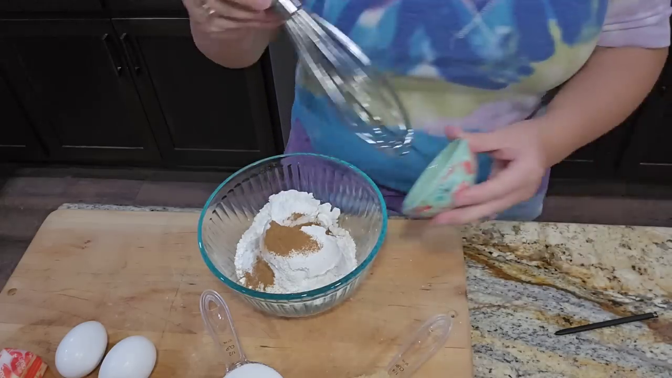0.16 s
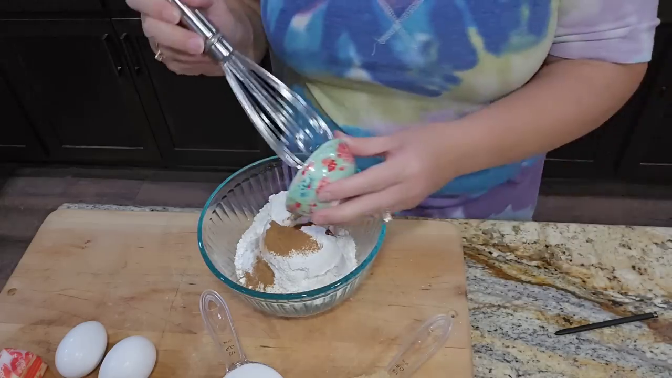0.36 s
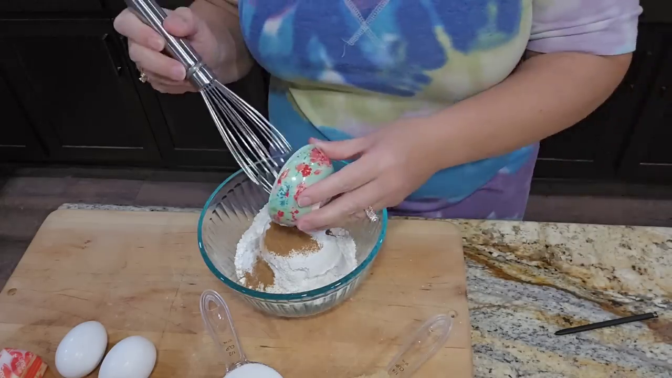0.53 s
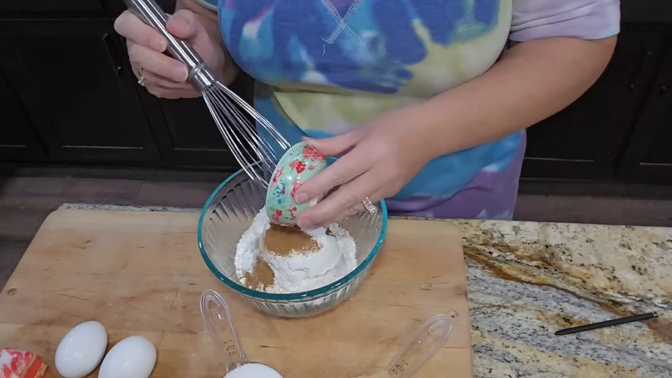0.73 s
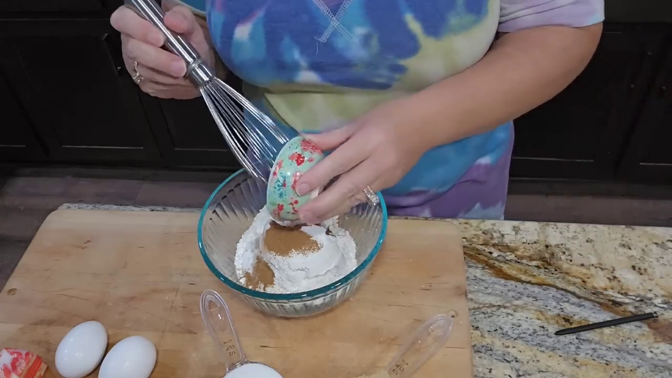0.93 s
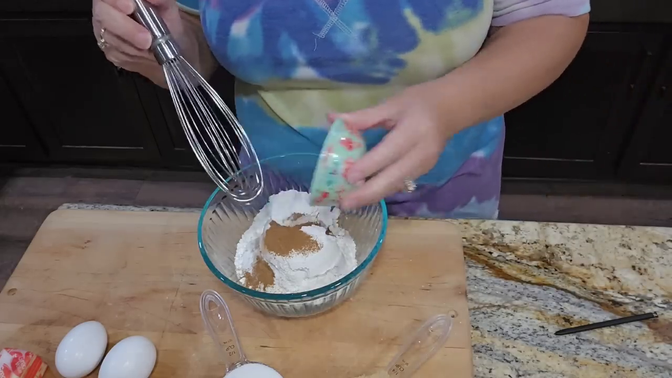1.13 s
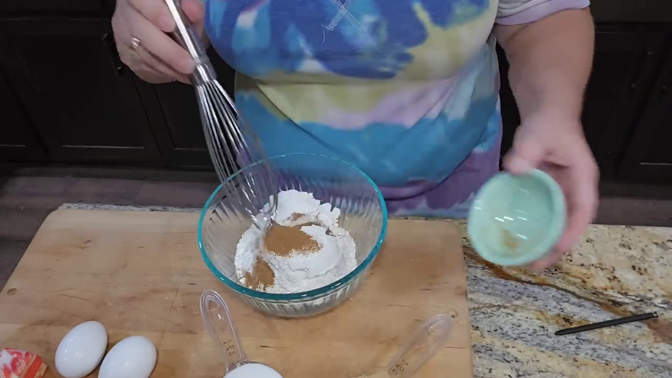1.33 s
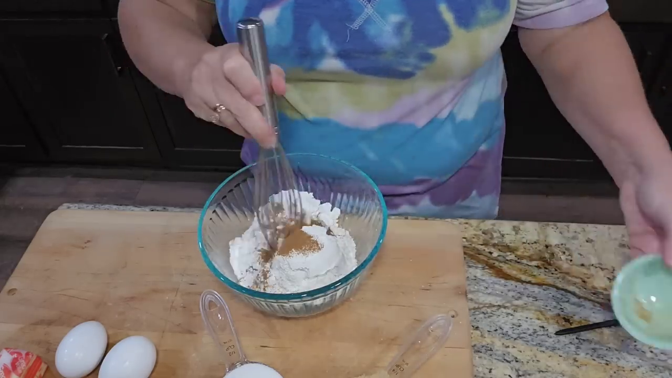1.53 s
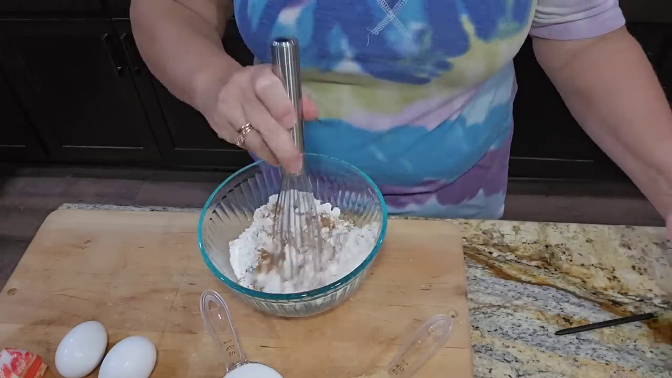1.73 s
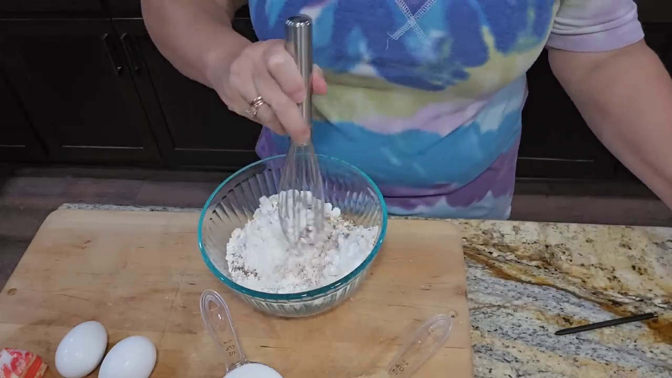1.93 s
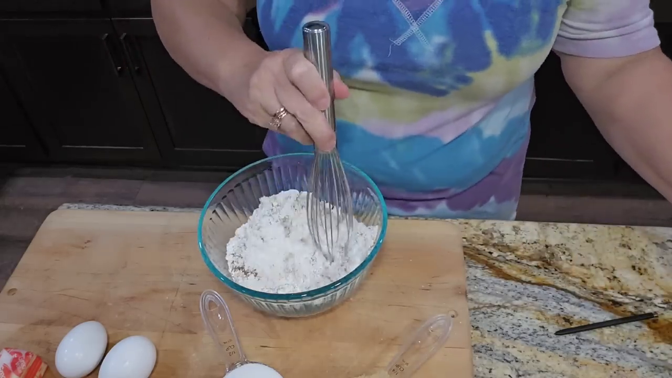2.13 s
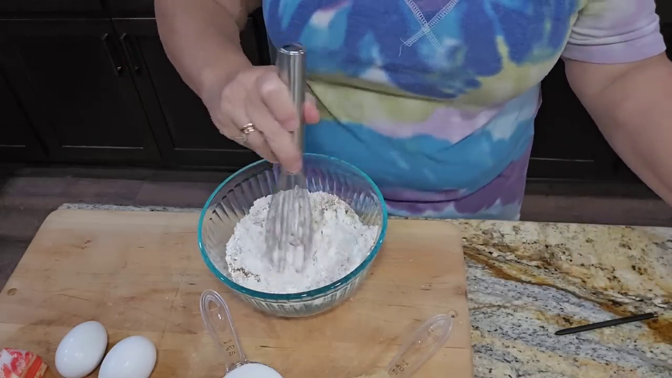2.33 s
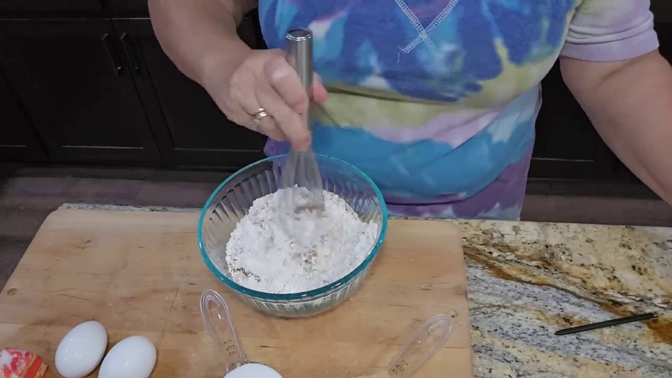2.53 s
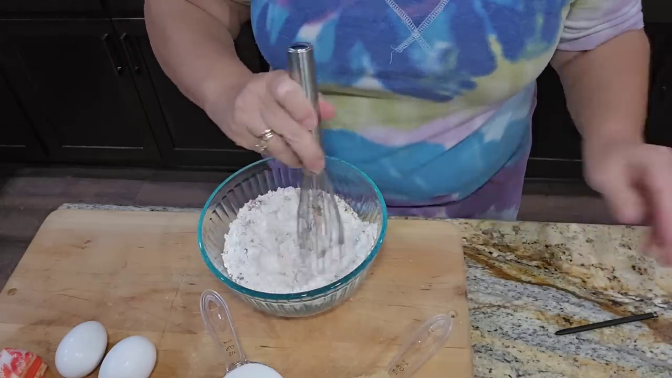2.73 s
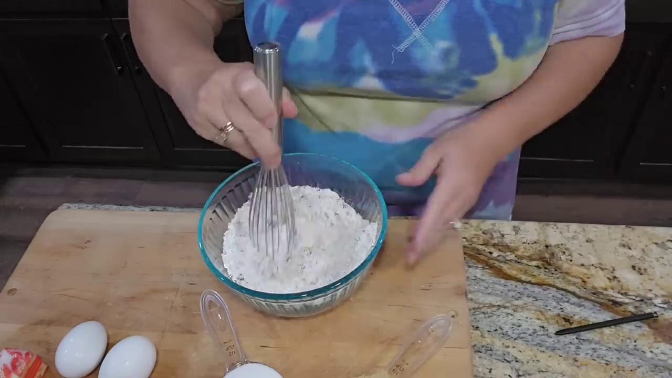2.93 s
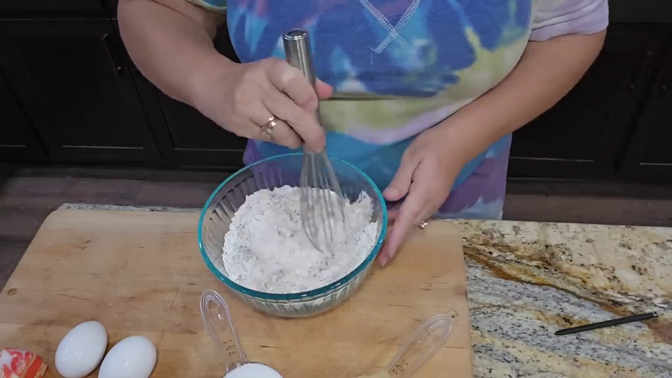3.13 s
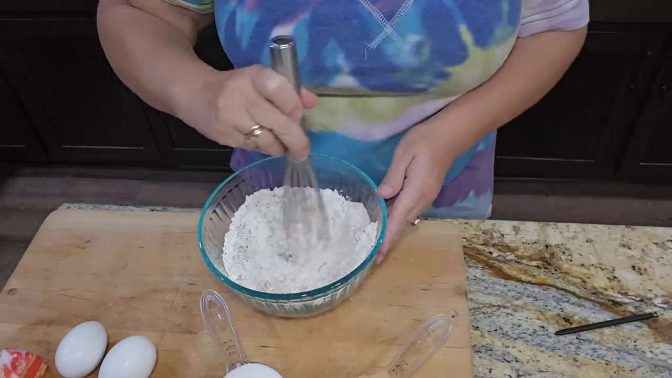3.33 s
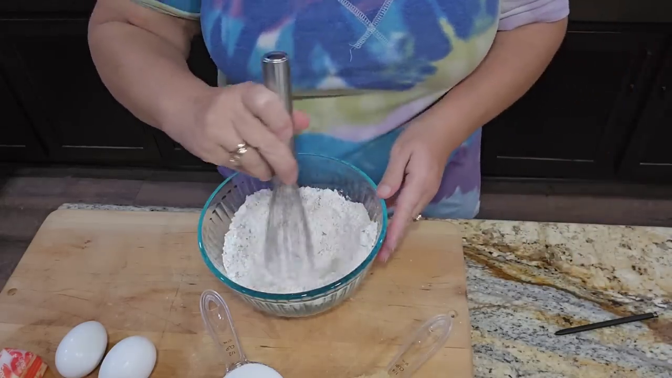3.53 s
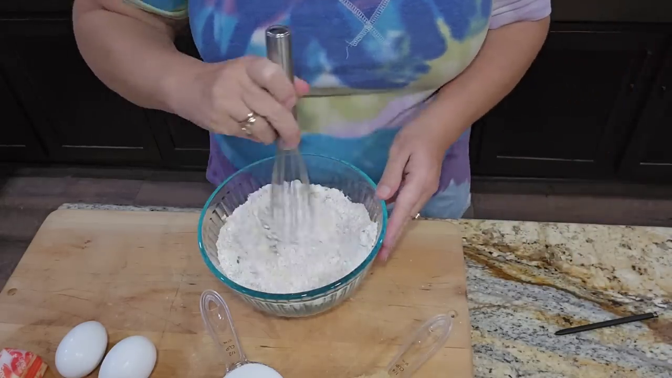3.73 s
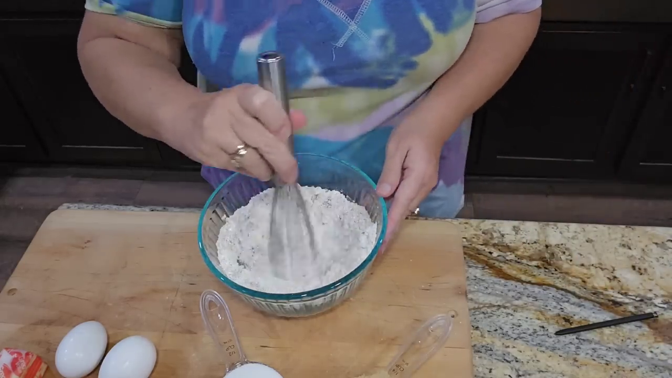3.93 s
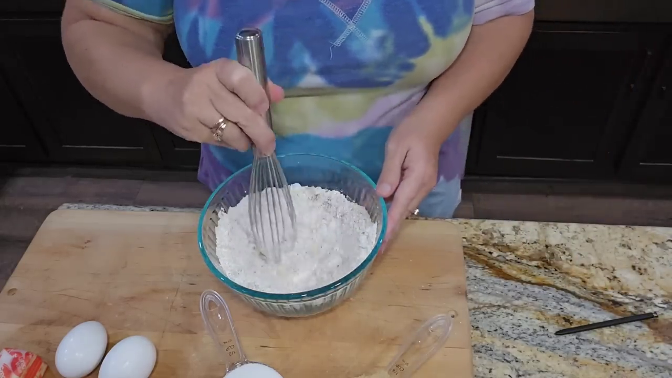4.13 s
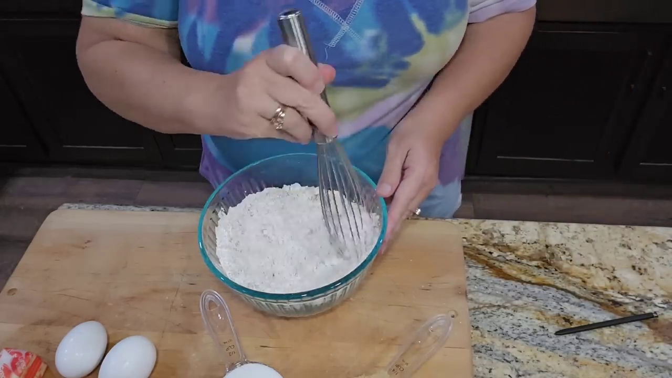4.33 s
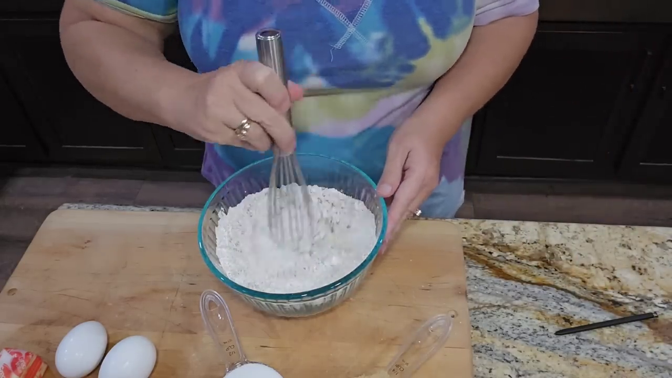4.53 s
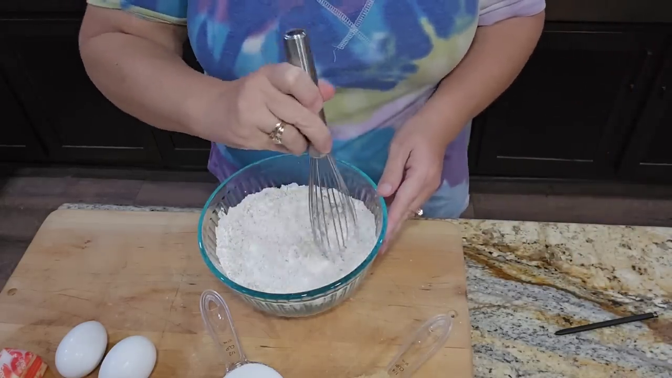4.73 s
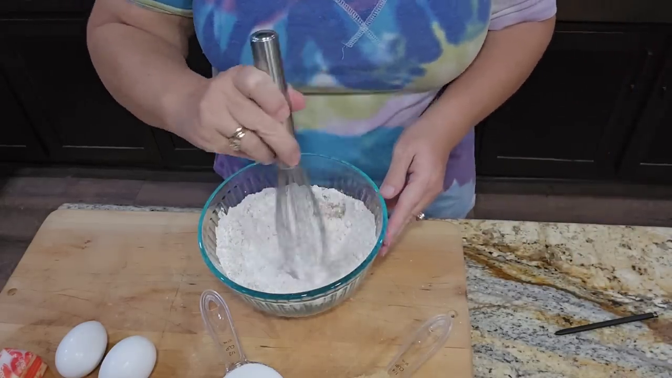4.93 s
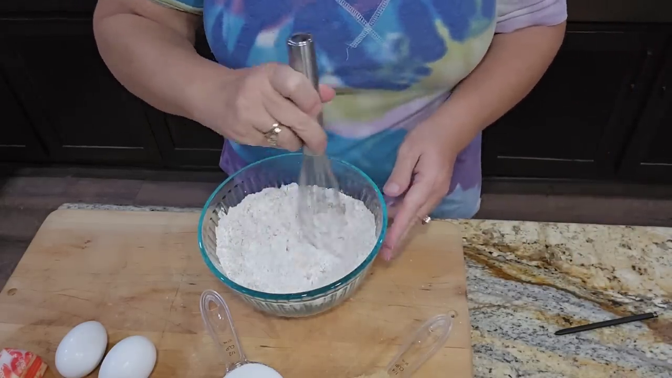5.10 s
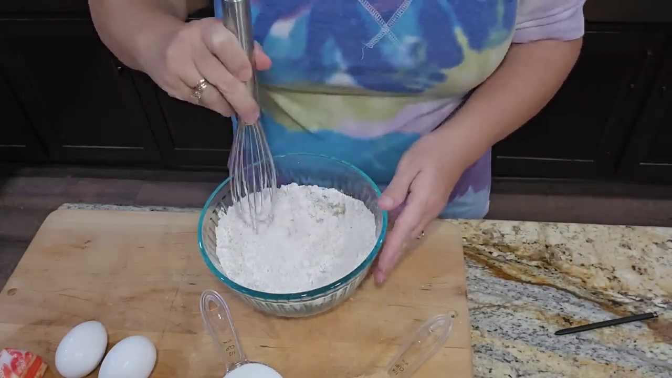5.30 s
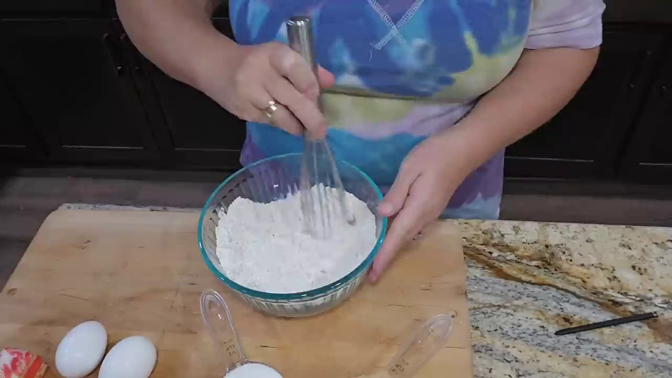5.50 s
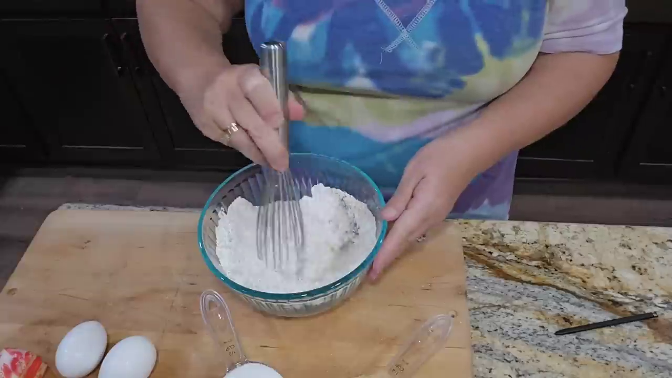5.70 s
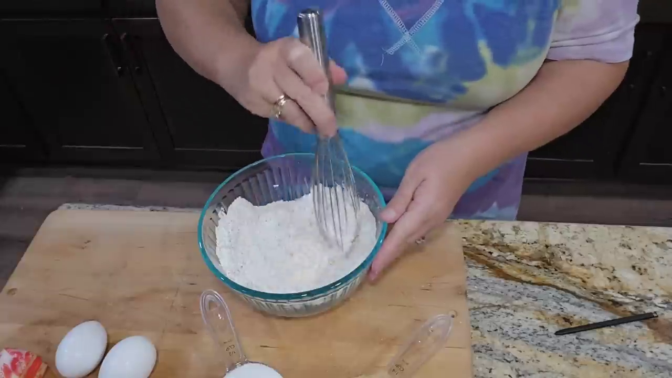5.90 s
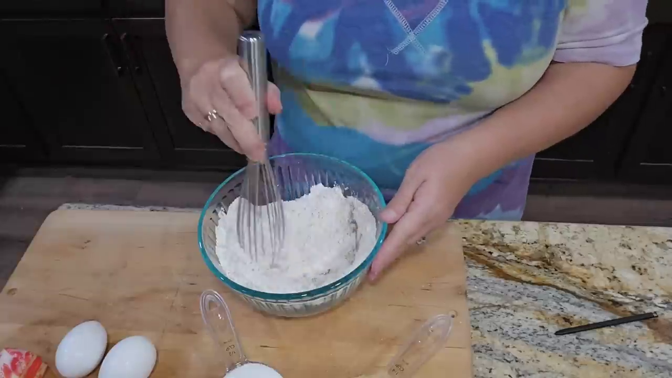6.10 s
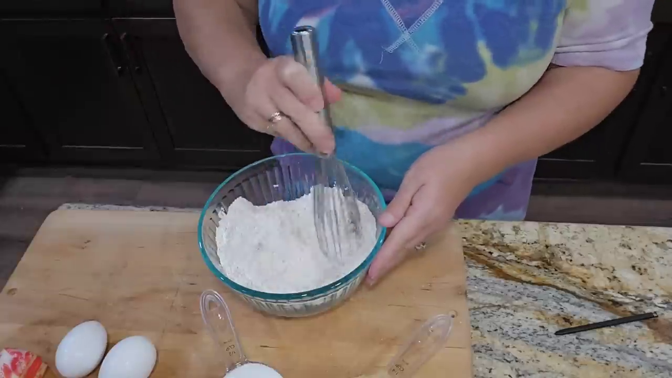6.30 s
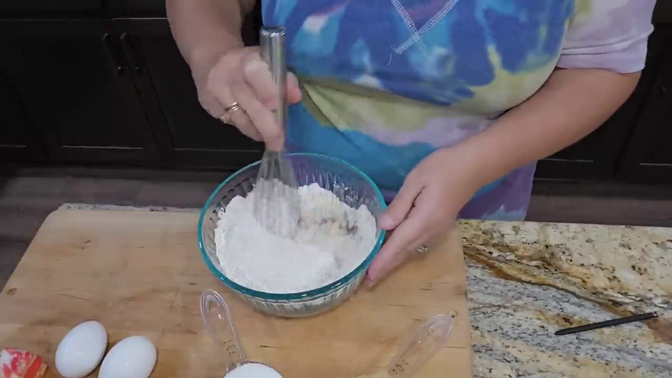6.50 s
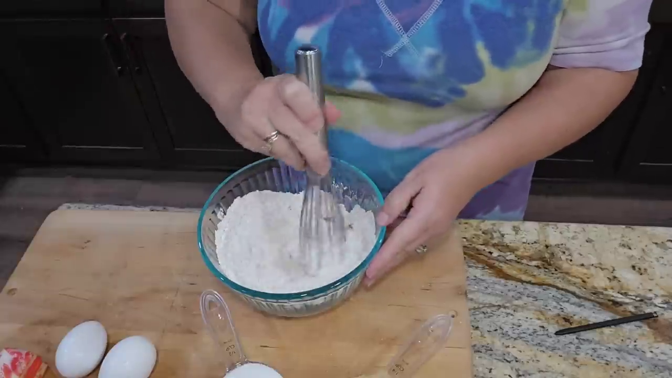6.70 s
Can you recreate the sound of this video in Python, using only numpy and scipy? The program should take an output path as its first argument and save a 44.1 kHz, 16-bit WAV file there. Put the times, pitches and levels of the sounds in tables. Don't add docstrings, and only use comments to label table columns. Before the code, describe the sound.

Close, fairly dry kitchen sounds over a steady low hush: a faint powdery slide, then sharp metallic clinks and gritty scraping as a whisk taps a hand-held cup, with a fading wire jingle. Crockery clatters in two bouncing landings on a stone counter, duller and more distant. Afterwards gentle, irregular swishes of flour continue, with occasional muted glass-bowl knocks and tiny wire pings.

```python
import sys
import numpy as np
from scipy import signal
from scipy.fft import rfft, irfft, next_fast_len
from scipy.io import wavfile

SR = 44100
rng = np.random.default_rng(int(sys.argv[2]) if len(sys.argv) > 2 else 0)


def pcm_store(signal):
    levels = np.round(np.clip(np.atleast_2d(signal), -1, 1) * 32767)
    wavfile.write(sys.argv[1], SR, levels.astype(np.int16).T)


def gain_from_decibels(decibels):
    exponent = np.asarray(decibels, float) / 20
    return 10 ** exponent


N = 297675

# start_s, short_wires_db, low_cup_ring_db, middle_wires_db, upper_ring_db
DRAGS = [(0.5772, -6, -33, -20.5, -37), (0.5894, -17, -37, -29.5, -33), (0.6014, -21.5, -39, -31.5, -33),
         (0.6134, -22.5, -42, -31, -34), (0.632, -18, -46, -39, -29), (0.646, -16, -45, -26.5, -28),
         (0.656, -17, -46.5, -33.5, -29), (0.676, -16, -48, -44.5, -23), (0.7005, -34, -47.5, -53, -32),
         (0.7344, -48.5, -47.5, -38.5, -48), (0.812, -14.5, -30.5, -33, -28),
         (0.8497, -23.5, -28.5, -39.5, -17.5), (0.8584, -18.5, -28.5, -38, -29.5),
         (0.8732, -23, -45, -37, -20.5), (0.883, -17, -41, -44, -25), (0.8964, -32.5, -40.5, -43, -38),
         (0.9094, -36, -53, -51.5, -47.5), (1.0374, -19.5, -34.5, -34, -24.5),
         (1.0474, -16.5, -37, -33, -21), (1.0564, -17.5, -41, -32, -21), (1.064, -12, -36, -38, -21),
         (1.073, -11, -39, -36, -37), (1.0854, -8, -33, -29, -36), (1.0962, -5.5, -34, -28, -24),
         (1.1034, -20, -40, -30, -18), (1.114, -11, -38, -34, -37), (1.13, -11, -46, -27, -37),
         (1.145, -17, -49, -38, -40), (1.1644, -30, -43, -47, -48), (1.1945, -34, -31, -34, -39)]


def rms_one(x):
    return x / np.sqrt(np.mean(x ** 2) + 1e-20)


def in_time(rows):
    s, *columns = np.transpose(rows)
    return [np.interp(np.arange(N) / SR, s, c, left=-120, right=-120) for c in columns]


def band(x, low_hz, high_hz):
    return signal.sosfilt(signal.butter(2, [low_hz, min(high_hz, .45 * SR)], "band", fs=SR, output="sos"), x)


def tone(hz, count):
    return np.sin(2 * np.pi * hz * np.arange(count) / SR)


def flicker(db, rate, count):
    r = np.exp(-80 * np.pi * rate / SR)
    slow = signal.lfilter([1], [1, -2 * r, r * r], rng.standard_normal(count // 40 + 2002))[2000:]
    return np.interp(np.arange(count) / 40, np.arange(len(slow)), gain_from_decibels(db * rms_one(slow)))


def coloured(spectrum, patchy_db, source):
    hz, db = np.transpose(spectrum)
    edges = np.geomspace(hz[0], hz[-1], int(3 * np.log2(hz[-1] / hz[0])) + 2)
    out = 0
    for k, (low, high) in enumerate(zip(edges, edges[1:])):
        level = gain_from_decibels(np.interp(np.log(low * high) / 2, np.log(hz), db))
        wander = flicker(patchy_db, 34.0, count=source.shape[1])
        out = out + level * wander * band(source[k % 2], low, high)
    return rms_one(out)


def contact(times, db, length_s, rise_s, count=N):
    marks = np.zeros(count)
    marks[(np.asarray(times) * SR).astype(int)] = gain_from_decibels(db)
    fall, rise = np.exp(-1 / (np.maximum([length_s, rise_s], 1e-4) * SR))
    return signal.lfilter([1 - rise], np.convolve([1, -fall], [1, -rise]), marks + 1e-18)


def strike(times, band_db, edges_hz, modes, length_s, rise_s, spread_db, split=0.):
    grit_share = .3
    modes, out = np.array(modes), np.zeros(N)
    register = np.searchsorted(edges_hz, modes[:, 0])
    luck_db = abs(spread_db) * rng.standard_normal((len(times), len(modes)))
    first = int(times[0] * SR)
    span = min(int(times[-1] * SR) + SR // 2, N) - first
    samples = max(length_s, 1e-4) * SR
    grit = rng.standard_normal(N + SR) * np.sqrt(1 / samples)
    for k, (hz, db, t60) in enumerate(modes):
        push_db = band_db[:, register[k]] + db + luck_db[:, k]
        push = contact(times - times[0], push_db, length_s, rise_s, count=span)
        clean = np.cos(2 * np.pi * hz * np.arange(span) / SR) / samples
        push = push * (grit_share * grit[first + 997 * k:][:span] + clean)
        r = gain_from_decibels(-60 / (t60 * SR))
        for w in 2 * np.pi * hz * (1 + split * np.array([-1, 1])) / SR:
            out[first:first + span] += signal.lfilter([0, np.sin(w)], [1, -2 * r * np.cos(w), r * r], push)
    return out


def grains(per_s, spread, count=N):
    sizes = gain_from_decibels(spread * np.minimum(rng.exponential(1, count), 5))
    sizes = sizes * rng.choice([-1, 1], count)
    return sizes * (rng.random((2, count)) < per_s / SR) + 1e-18


def background():
    # start_s, level_db
    murmur = [(0.0, -44.5), (0.38, -48.5), (0.77, -44.5), (0.98, -49.5), (1.61, -41.5), (2.01, -53),
              (2.22, -48.5), (2.4, -41.5), (2.65, -41), (2.84, -53), (3.48, -49.5), (4.02, -39.5),
              (4.23, -48.5), (5.58, -46), (6.35, -43.5), (6.75, -48)]
    # start_s, level_db
    leans = [
        (0.3, -50),
        (0.72, -49),
        (1.299, -54.5),
        (3.95, -50),
        (5.1, -41),
        (5.499, -62),
        (6.399, -58),
    ]
    # pitch_hz, level_db per Hz
    hush = [(41, -43), (70, 1), (121, 5), (343, -4.5), (813, -17.5), (2110, -20.5), (3100, -19),
            (3720, -20), (5000, -21), (10300, -23), (14200, -27.5), (15900, -34.5)]
    whine_hz, whine_width_hz = 14450, 70
    low_db, = in_time(murmur)
    lean = contact(*np.transpose(leans), length_s=0.107, rise_s=.08)
    white = rng.standard_normal((5, N))
    hum = gain_from_decibels(-62) * flicker(1.3, 3, count=N) * np.sqrt(2) * tone(53.3, N)
    rumble = (gain_from_decibels(-74.0) + lean) * rms_one(band(white[0], 44, 55))
    low = gain_from_decibels(low_db - 7.5) * rms_one(band(white[1], 120, 810))
    whine = gain_from_decibels(-70) * rms_one(band(white[2], whine_hz - whine_width_hz, whine_hz + whine_width_hz))
    return gain_from_decibels(-51) * coloured(hush, 1.4, white[3:]) + hum + rumble + low + whine


def flour():
    # middle_s, length_s, level_db
    pour = [
        (0.045, 0.17, -50.5),
        (0.182, 0.074, -51.5),
        (0.26, 0.053, -54.5),
        (0.37, 0.044, -58.5),
    ]
    # middle_s, length_s, level_db
    stir = [(1.748, 0.046, -59), (2.079, 0.031, -57), (2.255, 0.067, -54), (2.422, 0.057, -49),
            (2.584, 0.062, -48), (2.741, 0.042, -48), (2.844, 0.022, -60), (2.912, 0.033, -55.5),
            (3.073, 0.043, -48.5), (3.234, 0.072, -51.5), (3.392, 0.082, -58.5), (3.574, 0.036, -57),
            (3.665, 0.022, -54), (3.71, 0.05, -59), (3.813, 0.088, -53), (3.99, 0.089, -53.5),
            (4.172, 0.1, -53.5), (4.378, 0.082, -57.5), (4.578, 0.025, -53), (4.683, 0.075, -58.5),
            (4.867, 0.11, -63), (5.001, 0.12, -59), (5.277, 0.033, -50), (5.397, 0.063, -49.5),
            (5.56, 0.087, -55), (6.266, 0.085, -56), (6.475, 0.083, -58.5), (6.634, 0.065, -53.5)]
    # pitch_hz, level_db per Hz
    swish_colour = [(1500, 1), (2500, -3), (3200, 6.5), (3900, -15), (4800, 15.5), (5900, -8), (7200, -1),
                    (9000, -5.5)]
    s = np.arange(0, N + 64, 64) / SR
    middle, length, stroke_db = np.transpose(pour + stir)[:, :, None]
    bell = np.exp(-2 * ((s - middle) / (0.74 * length)) ** 2)

    def strokes(offset_db):
        return np.interp(np.arange(N) / SR, s, (gain_from_decibels(stroke_db + offset_db) * bell).sum(axis=0))

    powder = grains(9000, spread=2.86)
    swish = strokes(0.5) * coloured(swish_colour, 3.05, powder)
    air = strokes(-5) * rms_one(band(powder[1], 9000, 16000))
    return swish + air


def blend(first_db, second_db, share, colour_db):
    return np.outer(first_db, share) + np.outer(second_db, 1 - np.array(share)) + colour_db


def touches():
    # start_s, push_into_cup_db, clash_of_wires_db
    raps = np.array([(0.5204, -5, -46), (0.526, -12, -25), (0.5327, -16.5, -14), (0.5487, -15.5, -34),
                     (0.5624, -63, 3.5), (0.5654, -24.5, -26), (0.782, -24, -4.5), (0.7863, -14.5, -25.5),
                     (0.794, -16.5, -6), (0.806, -9, -53), (0.823, -18, -41.5), (.84, -23, -46),
                     (0.984, -35.5, -24.5), (0.9876, -13.5, -11), (0.99, -8, -9.5), (0.995, -15.5, -9),
                     (1.002, -15, 0), (1.013, -23.5, -7.5), (1.0227, -40.5, -3.5), (1.031, -25.5, -6),
                     (1.188, -30.5, -42)])
    cup_share = [0.82, 0.56, 0.52, 0.28]
    rap_colour_db = [-2, -18, -3, 1.5]
    drag_colour_db = [-3.5, -3, -4.5, -4.5]
    drags = np.array(DRAGS)
    s = np.r_[raps[:, 0], drags[:, 0]]
    rap_db = blend(raps[:, 1], raps[:, 2], cup_share, rap_colour_db)
    drag_db = drags[:, [2, 3, 4, 1]] + drag_colour_db
    crack_db = np.r_[raps[:, 2], drags[:, 1] + 3]
    order = np.argsort(s)
    return s[order], np.vstack([rap_db, drag_db])[order], crack_db[order]


def shimmer(x, count):
    out, first, last = np.zeros(N), int(.5 * SR), 2 * SR
    r = gain_from_decibels(-60 / SR / 0.081)
    pitches = np.geomspace(2200, 15300, count) * rng.uniform(.975, 1.025, count)
    for hz, db in zip(pitches, rng.normal(0, 4, count)):
        w = 2 * np.pi * hz / SR
        out[first:last] += signal.lfilter([0, gain_from_decibels(db) * np.sin(w)], [1, -2 * r * np.cos(w), r * r], x[first:last])
    return out


def whisk_on_cup():
    # start_s, level_db, short_wires_extra_db, middle_wires_db
    jingles = np.array([(1.2163, -36, 16, -40), (1.23, -31, 7, -31), (1.261, -33, 8.5, -39),
                        (1.279, -34, 15, -38), (1.2945, -35, 0, -34), (1.317, -33, 11, -35),
                        (1.337, -28.5, 6.5, -38), (1.358, -45, 7, -40), (1.3743, -42, 10, -42),
                        (1.394, -32, 3, -34), (1.4127, -35, 11, -36), (1.434, -30, 4, -33),
                        (1.454, -33, 2, -40), (1.4723, -30, 4, -41), (1.4912, -35, -6, -44),
                        (1.536, -37, -2, -42), (1.58, -37, -6, -50), (1.5994, -49, 3, -58)])
    jingle_colour_db = [-22, -8.5, -1, -10.5]
    edges_hz = [4200, 7500, 10900]
    # pitch_hz, level_db, ring_s (time to fall 60 dB)
    cup_modes = [(2060, -9, 0.019), (3340, 4.5, 0.023), (6080, 6.5, 0.049), (5550, -3.5, 0.051),
                 (8450, 10.5, 0.028), (9810, -1, 0.061), (12930, -1.5, 0.025), (13900, -5.5, 0.024),
                 (15150, -5.5, 0.049)]
    # pitch_hz, level_db, ring_s
    pressed_modes = [(5700, 5, 0.09), (5820, -14, 0.112), (6600, 0.5, 0.17), (6680, -6.5, 0.13),
                     (7380, -30.5, 0.091), (8743, -2, 0.17), (9200, -5, 0.0682), (10880, -8.5, 0.078),
                     (12500, -15, 0.099), (13000, -8, .04), (13760, 3, .025), (13940, -2.5, 0.0491),
                     (14700, -5.5, .05), (14870, -13, 0.078)]
    # pitch_hz, level_db, ring_s
    free_modes = [(3500, -16, 0.22), (4970, -21, 0.34), (5400, -30, 0.12), (5770, -19, 0.16),
                  (5880, -15, 0.072), (6640, -3, 0.081), (6753, -7.5, 0.36), (8900, -20.5, 0.31),
                  (9270, -9, 0.23), (9510, -9.5, 0.12), (11160, -14, 0.13), (14690, -8, 0.11)]
    # pitch_hz, level_db, ring_s
    shaking_modes = [(8500, -0.5, 0.059), (10700, -10, .1), (12640, -3, 0.16), (13733, 0, .06),
                     (13900, 3.5, 0.11)]
    # pitch_hz, level_db, ring_s
    clink_modes = [(13330, 4.5, 0.022), (13520, 1, .03)]
    # start_s, low_db, middle_db, upper_db
    tocks = np.array([(0.5625, -35, -27, -22.5), (0.5703, -32, -29.5, -11), (0.583, -38.5, -27.5, -23.5),
                      (0.831, -27.5, -24.5, -19), (0.834, -33.5, -34, -23), (0.8495, -35, -29, -27),
                      (0.859, -40.5, -40, -31), (0.867, -50, -50, -34), (1.029, -40, -36.5, -28.5),
                      (1.042, -50, -46, -37.5), (1.0635, -34, -26, -22), (1.069, -42, -42, -30)])
    # pitch_hz, level_db, ring_s
    hollow_modes = [(496.5, 6, 0.018), (575, -1, 0.032), (1044, 5, 0.049), (1095, -3, 0.04),
                    (1768, 10.5, 0.01575), (1869, 11, 0.015)]
    # start_s, level_db
    scrape = [
        (0.5, -65),
        (0.58, -18.5),
        (0.71, -27.5),
        (0.876, -40.5),
        (1.06, -32.5),
        (1.165, -18.5),
        (1.205, -32),
        (1.222, -23.5),
        (1.7, -40),
    ]
    # pitch_hz, level_db per Hz
    scrape_colour = [(710, -66.5), (1200, -16), (2340, 1), (2640, -34), (3450, 16), (3930, -19),
                     (5790, 0.5), (12100, -1.5), (13600, 6.5), (15800, -12)]

    rap_s, rap_db, clash_db = touches()
    drags = np.array(DRAGS)
    jingle_s = jingles[:, 0]
    bite_db = jingles[:, 1] + jingles[:, 2]
    jingle_db = np.c_[jingles[:, [1, 1, 3]], bite_db] + jingle_colour_db
    cup = gain_from_decibels(-1.0) * strike(rap_s, rap_db, edges_hz, cup_modes,
                             length_s=0.0083, rise_s=0.0017, spread_db=4.0, split=0.0069)
    pressed = gain_from_decibels(-13.5) * strike(rap_s, rap_db, edges_hz, pressed_modes,
                                  length_s=0.0053, rise_s=0.00075, spread_db=6.0, split=0.001)
    free = gain_from_decibels(4.5) * strike(jingle_s, jingle_db, edges_hz, free_modes,
                             length_s=.0035, rise_s=0.00015, spread_db=4.5, split=0.00068)
    shaking_db = -12 + jingles[:, 1:2] / 2 - 130 * (jingles[:, :1] - jingle_s[0])
    free += strike(jingle_s, shaking_db, [], shaking_modes,
                   length_s=.0035, rise_s=.0002, spread_db=-1.0, split=0.00032)
    free += strike(jingle_s, bite_db[:, None], [], clink_modes,
                   length_s=0.0063, rise_s=.0015, spread_db=0.5, split=0.0024)
    free += strike(drags[:, 0], drags[:, 1:2] - 9, [], clink_modes,
                   length_s=0.003, rise_s=.0009, spread_db=2.5, split=0.0045)
    hollow = gain_from_decibels(-1.0) * strike(tocks[:, 0], tocks[:, 1:], [800, 1400], hollow_modes,
                                length_s=0.0017, rise_s=0.00152, spread_db=1.85, split=0.004)
    cracks = contact(rap_s, clash_db - 22.5, 0.0057, 0.0012)
    cracks += contact(jingle_s, bite_db - 24, 0.0078, 0.00087)
    rub = gain_from_decibels(in_time(scrape)[0] - 19.5)
    grit = np.resize(coloured(scrape_colour, 1.5, grains(6000, spread=3.3, count=2 * SR)), N)
    scratch = (cracks + rub) * grit
    hiss = gain_from_decibels(-2.5) * scratch + gain_from_decibels(-41) * shimmer(scratch, count=48)
    return band(cup + hollow, 376, 22100) + pressed + free + hiss


def songs():
    # start_s, pitch_hz, level_db, ring_s
    lone_tones = [(0.574, 2403, -25, 0.32), (.672, 2430, -38.5, 0.49), (.575, 3035, -41, 1),
                  (.577, 5020, -28.5, 0.28), (.588, 9200, -30, 0.38), (.676, 9100, -27, 0.2),
                  (.8, 2406, -43, 1), (.86, 4700, -42.5, 0.32), (1.0, 2270, -36, 0.5),
                  (1.075, 4890, -34.5, 0.46), (1.14, 12000, -46, 0.18), (1.14, 9200, -44, .2),
                  (1.235, 2400, -43, 0.48), (1.3, 2213, -42.5, 0.55), (1.6, 1016, -54, 0.63),
                  (2.301, 1540, -38, 0.6), (2.38, 570, -39.5, 0.12), (2.44, 770, -32, 0.15),
                  (2.62, 3360, -40.5, 0.27), (2.183, 740, -19, .14), (2.211, 710, -20, 0.2),
                  (2.502, 2035, -19, 0.085), (2.633, 2035, -26, .07), (2.2, 2035, -33, 0.11),
                  (2.515, 700, -12.5, 0.11), (2.543, 2700, -19, .1), (2.584, 2035, -15, 0.18),
                  (5.685, 520, -26, 0.084), (5.715, 1085, -39, .08), (1.3, 3560, -45.5, 0.47),
                  (1.26, 4900, -41, .3), (1.27, 5960, -36, 0.27), (6.148, 1115, -34, 0.27),
                  (6.19, 570, -41, .3), (6.143, 900, -27, 0.063), (6.162, 700, -22, 0.076),
                  (5.503, 4210, -46, 0.13), (5.545, 4190, -52, 0.13), (5.505, 750, -48, 0.35)]
    rise_s, beat_hz, beat_depth = 0.00595, 23, 0.39
    out, t = np.zeros(N + SR), np.arange(SR // 2) / SR
    luck = rng.uniform(.5, 1.5, (len(lone_tones), 2))
    for (s, hz, db, t60), (pace, phase) in zip(lone_tones, luck):
        fade = gain_from_decibels(db - 60 * t / t60)
        beat = 1 + beat_depth * np.sin(2 * np.pi * (beat_hz * pace * t + phase))
        swell = 1 - np.exp(-t / rise_s)
        out[int(s * SR):][:len(t)] += fade * swell * beat * np.sin(2 * np.pi * hz * t)
    return out[:N]


def bowl():
    # start_s, board_thud_db, glass_ring_db, wire_edge_db
    hits = np.array([(1.812, -38, -68, -67.5), (1.871, -62, -43, -48.5), (3.139, -39, -38, -68),
                     (3.194, -44, -36.5, -42.5), (3.324, -32.5, -43, -56), (4.118, -32, -55.5, -48),
                     (4.616, -24.5, -32.5, -43), (4.641, -59, -41, -48), (4.917, -32, -32.5, -41),
                     (5.219, -23.5, -56, -45), (5.27, -53, -48, -40), (5.503, -55, -45, -47),
                     (5.621, -34, -26.5, -39), (5.643, -60, -40, -64), (5.683, -15, -25.5, -35),
                     (5.696, -33, -27.5, -44), (5.724, -58, -31.5, -48), (6.141, -19.5, -35, -34.5),
                     (6.148, -15.5, -30, -56), (6.165, -37.5, -26, -38.5)])
    # pitch_hz, level_db, ring_s
    bowl_modes = [(405, -5, 0.041), (449, 1.5, 0.019), (525.6, 5.5, 0.029), (712, -6, 0.036),
                  (893, 1.5, 0.022), (1090, -8, 0.04), (1590, 3, .015), (1850, 7.5, 0.014),
                  (2290, 1, 0.023), (2620, -5.5, 0.029)]
    # start_s, level_db, pitch_hz (region)
    pings = np.array([
        (4.293, -45, 4200),
        (5.234, -45.5, 9300),
        (5.272, -52, 6200),
        (5.5294, -43.5, 6700),
        (5.5568, -56, 5550),
        (5.5794, -48, 6060),
    ])
    # pitch_hz, level_db, ring_s
    wire_modes = [(4182, 1.5, 0.15), (6100, -1.5, 0.026), (5850, 3.5, 0.06), (8770, 2, 0.069),
                  (11800, -5, .1), (14400, -14, .06)]
    ping_db = pings[:, 1:2] - 12 * abs(np.log2(pings[:, 2:] / [4200, 5800, 9400]))
    hit_s = hits[:, 0]
    body = gain_from_decibels(-3.0) * strike(hit_s, hits[:, 1:], [620, 1350], bowl_modes,
                              length_s=0.011, rise_s=0.001, spread_db=-1.0, split=0.0043)
    white = rng.standard_normal((2, N))
    puff_noise = rms_one(band(band(white[0], 270, 1250), 250, 1320))
    puff = contact(hit_s, hits[:, 2] - 11, 0.017, 0.0034) * puff_noise
    heave = contact(hit_s, 0.32 * hits[:, 1] - 31, 0.016, 0.047) * tone(51.8, N)
    rattle = gain_from_decibels(-4) * strike(hit_s, hits[:, 3:], [], wire_modes[1:4],
                              length_s=.01, rise_s=.002, spread_db=3, split=.025)
    tick = contact(hit_s, hits[:, 3] - 12, 0.018, 0.0015) * rms_one(band(white[1], 1200, 19000))
    sung = gain_from_decibels(1) * strike(pings[:, 0], ping_db, [4800, 7500], wire_modes,
                           length_s=0.02, rise_s=.0028, spread_db=3, split=.004)
    return band(body + puff, 220, 7600) + heave + rattle + tick + sung


def taps():
    # start_s, level_db
    hard_points = [
        (2.1815, -6),
        (2.1895, -12),
        (2.209, -7),
        (2.2135, -9),
        (2.2525, -11),
        (2.261, -9),
        (2.5032, -12),
        (2.5435, -8),
        (2.633, -5),
        (2.6395, -6.5),
    ]
    s, db = np.transpose(hard_points)
    clicks = contact(s, db, .0001, .0001)
    return -gain_from_decibels(10) * band(band(clicks, 700, 3542), 273, 4600)


def cup_set_down():
    # start_s, clatter_db, clear_ring_db, low_body_db, mid_body_db
    hits = np.array([(2.18, -1, -27, -2.5, -1.5), (2.195, -8, -49.5, -7, -7.5), (2.206, -6, -30, -7.5, -2),
                     (2.221, -9.5, -50.5, 0, -15), (2.236, -15, -46.5, -7.5, -15.5),
                     (2.254, -14.5, -51.5, -13, -17.5), (2.264, -13.5, -56, -18, -16.5),
                     (2.496, -20.5, -31, -34, -24.5), (2.5, -2, -11.5, -3.5, -0.5),
                     (2.51, -13, -21.5, -1.5, -8.5), (2.52, -16.5, -13, -4, -4.5),
                     (2.541, -0.5, -8.5, -13.5, -1), (2.563, -13, -14, -5.5, -17),
                     (2.585, -4.5, -21, -0.5, -2), (2.594, -10.5, -24.5, -7, 1),
                     (2.608, -4.5, -8.5, -6, -5), (2.622, -11, -20, -18, -10.5),
                     (2.632, -2.5, -34.5, -13, 2), (2.642, -12.5, -20, -17, -4)])
    body_colour_db = [-10, -5]
    # pitch_hz, level_db, ring_s
    counter_modes = [(546, -7.5, 0.15), (698, -6, .07), (763.5, 5.5, 0.06), (819, -3, 0.0693),
                     (947, -17.5, 0.092), (1090, -4.5, 0.088), (1222, -10, 0.073), (1337, -7.5, 0.11),
                     (1527, -0.5, 0.065), (1665, -3, 0.13), (1763, -1.5, 0.049), (2020, -1.5, 0.045),
                     (2282, -3, 0.067), (2580, 1, 0.041)]
    # pitch_hz, level_db, ring_s
    ring_modes = [(3365, 2.5, .13)]
    # pitch_hz, level_db per Hz
    clatter_colour = [(250, -14), (500, -11), (800, -2), (2100, -3.5), (2900, -14), (4000, -54.5),
                      (4900, -37)]
    hit_s, hit_db = hits[:, 0], hits[:, 1]
    body = gain_from_decibels(-10.0) * strike(hit_s, hits[:, 3:] + body_colour_db, [1250], counter_modes,
                               length_s=0.0036, rise_s=0.00022, spread_db=3.5, split=0.0098)
    clear = gain_from_decibels(-8) * strike(hit_s, hits[:, 2:3], [], ring_modes,
                             length_s=.003, rise_s=.0008, spread_db=0, split=.0002)
    noise = np.resize(coloured(clatter_colour, 1.5, rng.standard_normal((2, SR))), N)
    blow = contact(hit_s, hit_db - 14, 0.0035, 0.000826)
    buzz = contact(hit_s, hit_db - 25, 0.038, 0.00406)
    clatter = (blow + buzz) * noise
    thump = contact(hit_s, hit_db - 42, 0.027, 0.005) * rms_one(band(rng.standard_normal(N), 72, 390))
    chink_noise = rms_one(band(rng.standard_normal(N), 2600, 4006))
    chink = contact(hit_s, 0.344 * hits[:, 2] + hit_db - 22, 0.015, .0004) * chink_noise
    snap_noise = rms_one(band(band(rng.standard_normal(N), 3600, 5250), 3600, 5250))
    snap = contact(hit_s, hit_db - 41, 0.0022, .0003) * snap_noise
    mids = signal.sosfilt(signal.butter(4, 280, "high", fs=SR, output="sos"), body + clear + clatter)
    soft_edge = signal.ellip(6, 1, 50, 4700, fs=SR, output="sos")
    return signal.sosfilt(soft_edge, thump + chink + snap + mids + taps())


def kitchen(x):
    t60_s, wall_cut_hz = 0.39, 15000
    size = next_fast_len(N + SR // 2)
    hz, tail = np.arange(size // 2 + 1) * SR / size, 0
    loss = np.log(1000) / t60_s * (1 + (hz / wall_cut_hz) ** 2) + 2j * np.pi * hz
    for k, lag_s in enumerate(rng.uniform(.011, .05, 20)):
        loop = np.exp(-loss * lag_s)
        tail = tail + (-1) ** k * loop / (1 - loop)
    return irfft(rfft(x, size) * tail, size)[:N] * np.sqrt(8 / 20)


def scene():
    near, side, knocks = whisk_on_cup(), cup_set_down(), bowl()
    wet = kitchen(gain_from_decibels(-27) * near + gain_from_decibels(-15.0) * band(side, 300, 2900) + gain_from_decibels(-19) * knocks)
    return (near + side + knocks + wet + songs() + flour() + background())[None]


def low_pass(x):
    return signal.sosfilt(signal.butter(12, 16450, fs=SR, output="sos"), x)


def record(dry):
    lean = signal.sosfilt(signal.butter(3, 40, "high", fs=SR, output="sos"), dry)
    cut = signal.sosfilt(signal.ellip(10, .5, 50, 15620, fs=SR, output="sos"), lean)
    return low_pass(np.clip(cut, -1, 1))


dry = scene()
out = record(dry)
pcm_store(out)
```